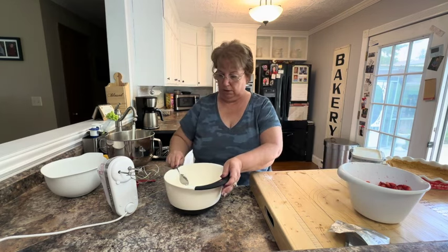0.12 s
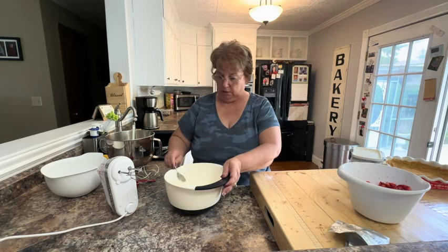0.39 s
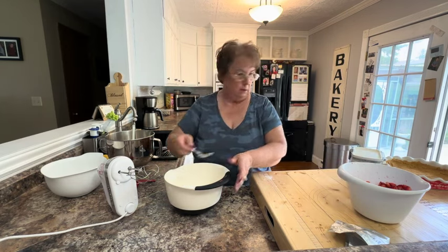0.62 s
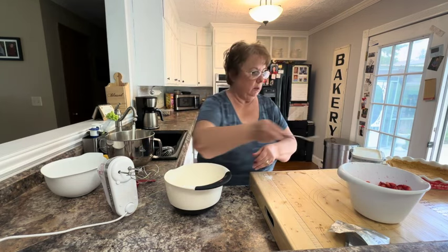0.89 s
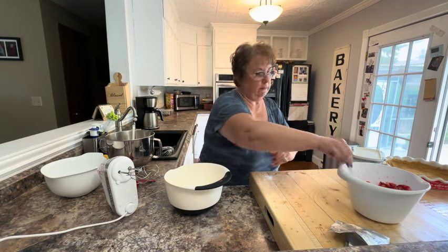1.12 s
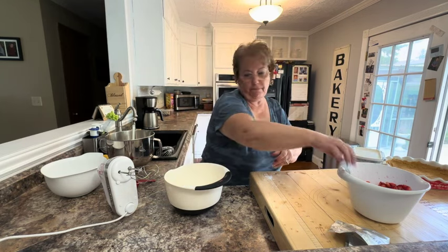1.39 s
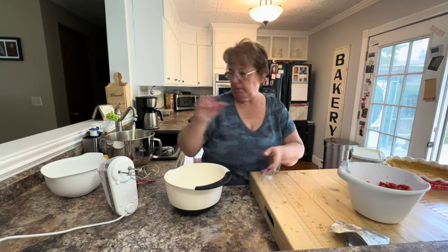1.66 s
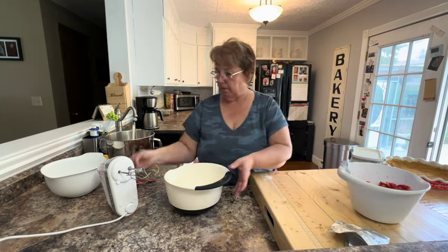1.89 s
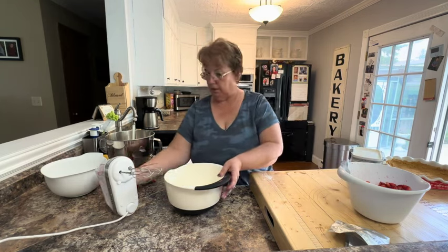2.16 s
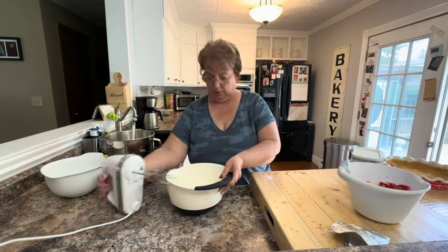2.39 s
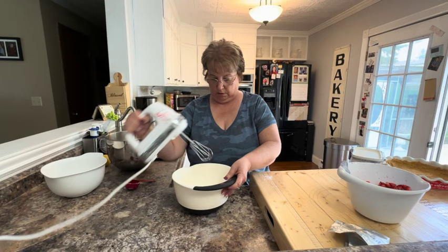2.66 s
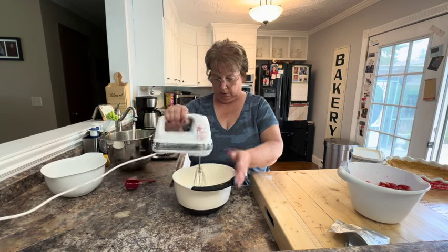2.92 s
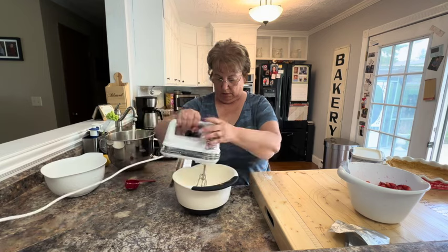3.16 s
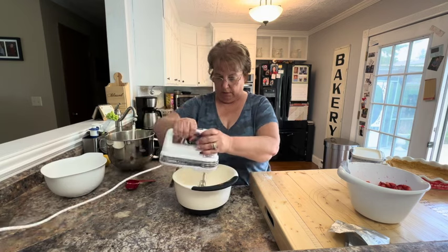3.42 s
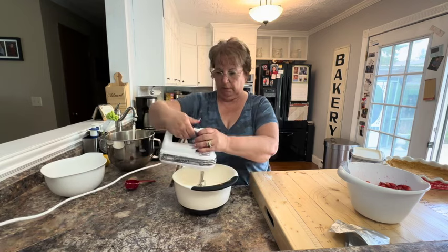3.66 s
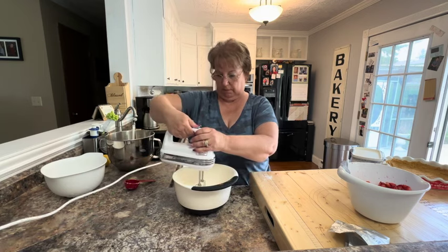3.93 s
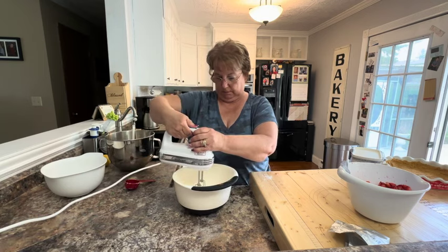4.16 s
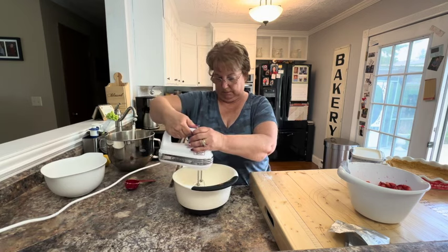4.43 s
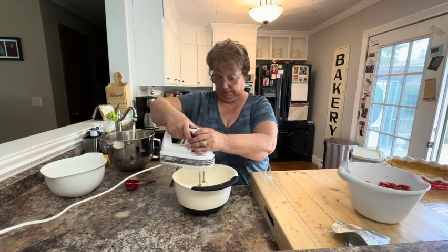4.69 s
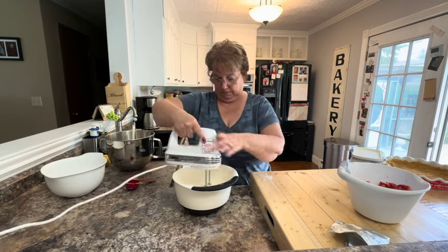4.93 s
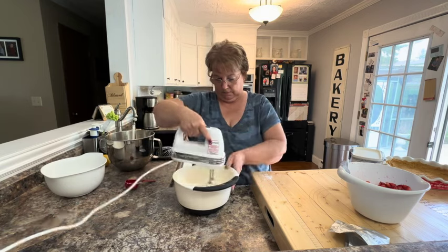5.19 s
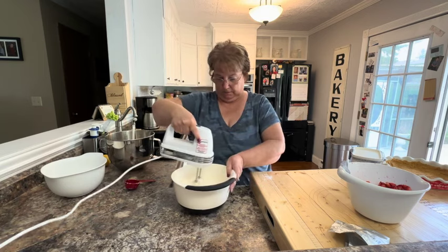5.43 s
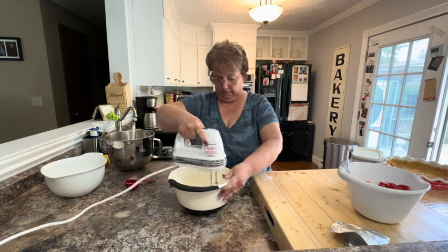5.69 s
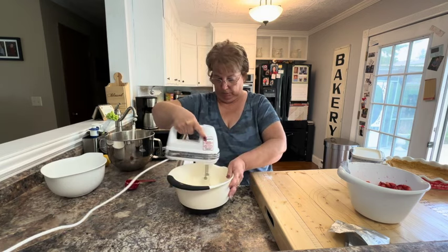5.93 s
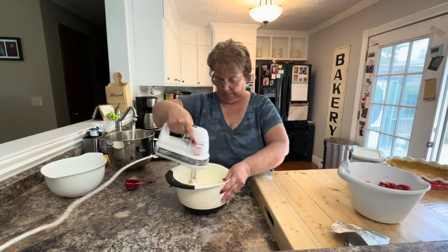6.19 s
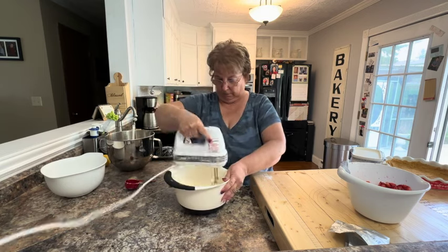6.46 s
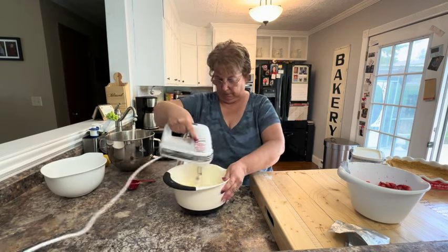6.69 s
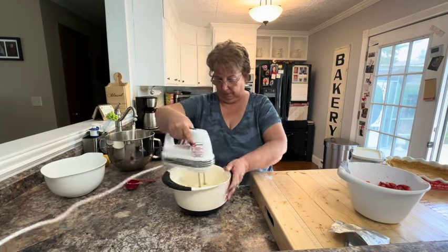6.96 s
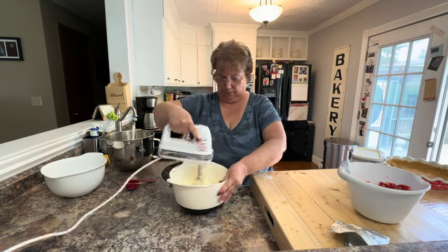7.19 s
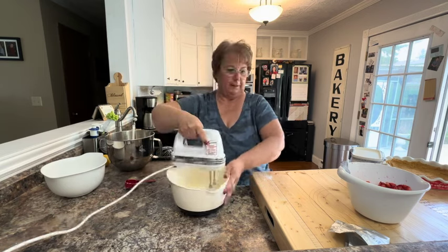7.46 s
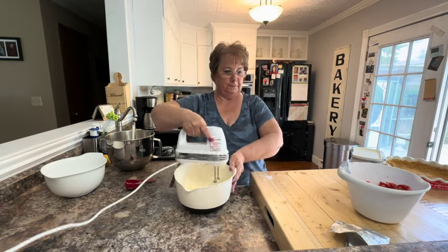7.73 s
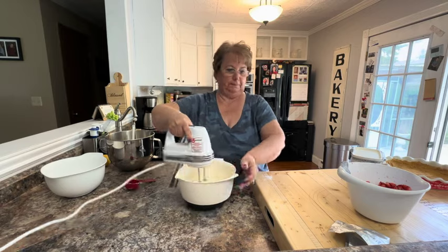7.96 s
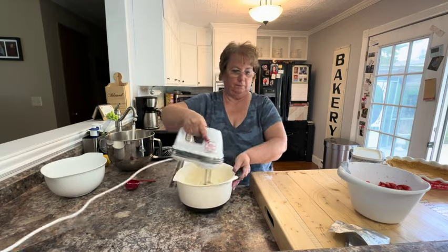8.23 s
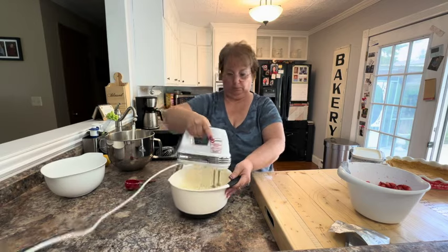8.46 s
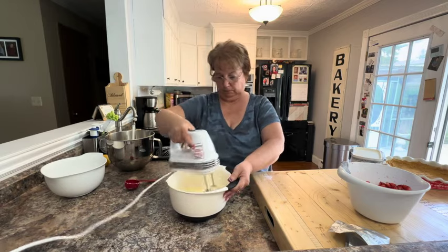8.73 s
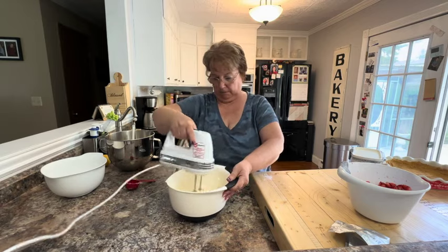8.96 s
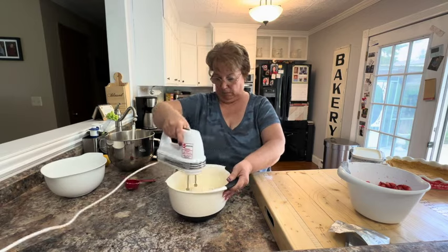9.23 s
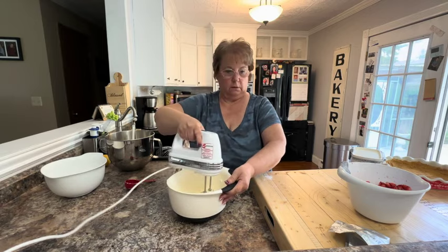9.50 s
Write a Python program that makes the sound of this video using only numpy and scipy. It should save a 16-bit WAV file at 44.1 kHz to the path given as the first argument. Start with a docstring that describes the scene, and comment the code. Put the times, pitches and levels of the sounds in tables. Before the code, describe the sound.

Dull plastic bowl taps, a wooden clack and a hard cup knock over faint low house hum and soft rustling. After light handling noises an electric hand mixer clicks on and climbs into a buzzing, airy whine with beaters churning batter. Abruptly it drops far in level and plays sped up, thin and high with fluttering pitch. Indoor kitchen, fairly close single microphone, short reflections.

```python
"""A home kitchen: a spoon taps a plastic bowl and is laid on a board, a cup and a hand mixer knock on the stone counter.
Each blow rings damped sines and adds bursts of noise; floor, counter and room answer it.
The mixer's switch clicks, its mains motor runs up with whining tones and noisy air, and its beaters slap batter.
From 5.598 s on, everything plays 2.4 times faster, so higher in pitch, and turned down by 18 dB."""
import sys
import numpy as np
from scipy import signal
from scipy.fft import rfft, irfft, next_fast_len
from scipy.io import wavfile
from scipy.ndimage import uniform_filter1d

SR = 44100
rng = np.random.default_rng(int(sys.argv[2]) if len(sys.argv) > 2 else 0)


def master(y):
    """Save y as 16-bit WAV."""
    cut = np.clip(np.atleast_2d(y).T, -1, 1)
    pcm = np.round(cut * 32767)  # scale
    wavfile.write(sys.argv[1], SR, pcm.astype(np.int16))


def field_ratio(decibels):
    """Amplitude ratio for a level in dB (20 dB per decade); scalars and array-likes work."""
    return 10 ** (np.asarray(decibels, dtype=float) / 20)


N = 423801
SPEED_UP_S, PACE = 5.598, 12 / 5   # heard time at which the speed-up starts, and how many times faster
SPEED_UP = round(SPEED_UP_S * SR)
LIVE = SPEED_UP + round((N - SPEED_UP) * PACE)   # samples of kitchen time, before the speed-up
MAINS_PULSE_HZ = 120   # in kitchen time, like every pitch below

# Table levels are relative: the functions trim them. Times are heard times.
# ways the plastic bowl rings: (frequency [Hz], level [dB], time to fall 60 dB [s])
BOWL_MODES = [(380, -3, 0.022), (540, 2.5, .028), (683, 0.5, .024), (830, -8, .016), (1090, -7, .016),
              (1310, -5, .016), (1465, -2, .018), (1610, -4, .016), (1780, -8, 0.012), (2230, -11, .01),
              (2900, -17, 0.008), (3290, -11, .008), (3930, -16, .009)]


def rms_one(x):
    """Scale to rms 1."""
    return x / np.sqrt(np.mean(x ** 2) + 1e-20)


def live_sample(s):
    """Turn heard seconds into samples of kitchen time."""
    s = np.asarray(s)
    kitchen_s = s + np.maximum(s - SPEED_UP_S, 0) * (PACE - 1)
    return np.round(kitchen_s * SR).astype(int)


def in_time(rows):
    """Draw each column of a table as a curve, sample by sample in kitchen time."""
    s, *columns = np.transpose(rows)
    return [np.interp(np.arange(LIVE), live_sample(s), c) for c in columns]


def at_hz(points, hz):
    """Read a table between its points on a log-frequency axis."""
    point_hz, value = np.transpose(points)
    return np.interp(np.log(hz), np.log(point_hz), value)


def band(x, low_hz, high_hz):
    """Butterworth band-pass: keep only the pitches between two limits."""
    sos = signal.butter(2, [low_hz, min(high_hz, .45 * SR)], "band", fs=SR, output="sos")
    return signal.sosfilt(sos, x)


def above(x, hz):
    """Butterworth high-pass: keep only the pitches above a limit."""
    return signal.sosfilt(signal.butter(2, hz, "high", fs=SR, output="sos"), x)


def coloured(spectrum, size):
    """Noise shaped to a given spectrum, rms 1."""
    fast = next_fast_len(size)
    hz = np.maximum(np.arange(fast // 2 + 1) * SR / fast, 1)
    shaped = rfft(rng.standard_normal(fast)) * field_ratio(at_hz(spectrum, hz))
    return rms_one(irfft(shaped, fast)[:size])


def drift(rate):
    """Slow random wander of rms 1: straight lines between 2 * rate random points a second."""
    steps = rng.standard_normal(int(LIVE / SR * 2 * rate) + 2)
    return rms_one(np.interp(np.arange(LIVE) / SR * 2 * rate, np.arange(len(steps)), steps))


def resonance(x, hz, width_hz):
    """Two-pole resonance with gain 1 at its peak."""
    r = np.exp(-np.pi * width_hz / SR)
    return signal.lfilter([(1 - r * r) / 2, 0, (r * r - 1) / 2], [1, -2 * r * np.cos(2 * np.pi * hz / SR), r * r], x)


def clicks(at, db, size):
    """One impulse per blow."""
    return np.bincount(at, field_ratio(db), size)


def ring(impulses, hz, t60):
    """A unit impulse sets a sine of starting height 1 ringing; it falls 60 dB in t60 seconds."""
    r, w = field_ratio(-60 / (t60 * SR)), 2 * np.pi * hz / SR
    return signal.lfilter([0, np.sin(w)], [1, -2 * r * np.cos(w), r * r], impulses + 1e-18)


def blows(events, modes, top_db, spread_db, chatter_s):
    """Each blow rings the body, knocks and cracks; harder contacts tilt the ringing up; top_db lifts the crack's top."""
    s, body_db, crack_db, hard_db = np.transpose(events)
    first = max(live_sample(s[0]) - 100, 0)
    at = live_sample(s) - first
    size = min(at[-1] + SR // 2, LIVE - first)
    low_hz = .7 * modes[0][0]

    def puff(db, t60, low_hz, high_hz):
        """Dying band noise with a rounded start."""
        fade = signal.lfilter([1], [1, -field_ratio(-60 / (t60 * SR))], clicks(at, db, size))
        noise = band(band(rng.standard_normal(size), low_hz, high_hz), low_hz, high_hz)
        return signal.lfilter([.04], [1, -.96], fade) * noise

    luck = rng.normal(0, spread_db, (len(at), len(modes)))   # where the blow lands favours some modes
    late = (rng.random(luck.shape) * chatter_s * SR).astype(int)   # the contact chatters: modes start unevenly
    body = np.zeros(size)
    for k, (hz, db, t60) in enumerate(modes):
        mode_db = body_db + db - 5.0 + hard_db * np.log2(hz / 1000) + luck[:, k]
        body += ring(clicks(at + late[:, k], mode_db, size), hz, t60)
    # the contact lasts about a quarter of a millisecond
    body = above(np.convolve(body, np.hanning(12) / 5.5)[:size], low_hz)
    # the many dull modes blur together
    knock = puff(body_db - 1.5, 0.028, low_hz, 1200) + puff(body_db - 3.0 + hard_db, 0.022, 1100, 2800)
    crack = puff(crack_db + 10, 0.013, 2500, 8000) + puff(crack_db + top_db, 0.009, 8500, 19000)
    return np.pad(body + knock + crack, (first, LIVE - first - size))


def earlier_tap():
    """A bowl tap at time 0, of which only the echo will be heard."""
    return blows([(0, -22, -42.0, -0.6)], BOWL_MODES, top_db=7.0, spread_db=2.5, chatter_s=.002)


def kitchen(x):
    """Reflections: octave bands of noise, each dying at its own rate."""
    # how long the room rings: (frequency [Hz], time to fall 60 dB [s])
    room_t60 = [(100, 0.43), (1000, 0.4), (4000, 0.35), (12000, 0.24)]
    t = np.arange(SR // 2) / SR
    tail = np.zeros(len(t))
    for low in 44 * 2 ** np.arange(9):
        tail += band(rng.standard_normal(len(t)), low, 2 * low) * field_ratio(-60 * t / at_hz(room_t60, 1.2 * low))
    tail *= np.clip((t - .003) / 0.0035, 0, 1)   # the first reflection needs 3 ms
    return signal.fftconvolve(x, tail / np.sqrt(np.sum(tail ** 2)))[:LIVE]


def counter_and_floor():
    """Heavy blows push floor and counter for 5 ms, and these heavy parts ring low."""
    # blows that shake them: (time [s], floor boom level [dB], counter thud level [dB], hollow thump level [dB])
    heavy = [(0, -41.5, -47, -54.5), (0.101, -35, -36, -37.5), (0.293, -38, -24, -28),
             (1.144, -70, -43.5, -47), (1.183, -65, -25.5, -19), (1.354, -68, -35.5, -36.5),
             (2.276, -55, -26, -45.5), (2.294, -49, -31.5, -43), (2.43, -46, -30, -41),
             (3.353, -42.5, -53, -36), (4.3, -47, -56, -57)]
    s, boom_db, thud_db, thump_db = np.transpose(heavy)
    at, push = live_sample(s), np.hanning(SR // 200) / (SR // 400)
    thud = ring(clicks(at, thud_db + 12, SPEED_UP), hz=169.5, t60=.075)
    thump = ring(clicks(at, thump_db + 11.5, SPEED_UP), hz=265, t60=0.022)
    boom = ring(clicks(at, boom_db + 9.0, SPEED_UP), hz=66.94, t60=0.086)
    low = above(above(thud + thump, 130), 130) + boom
    return np.pad(np.convolve(low, push)[:SPEED_UP], (0, LIVE - SPEED_UP))


def background():
    """Noise shaped as low house hum and the rustle of sleeves and cord, up to the speed-up only."""
    # fridge and house: (frequency [Hz], level [dB per Hz])
    hum_spectrum = [(18, -42.5), (30, -20), (81, -6), (97, 3.5), (115, -8.5), (135, -16), (424, -38),
                    (460, -25), (500, -52), (650, -66.5), (1100, -120)]
    # sleeves and cord move: (start [s], length [s], hiss level [dB], rub level [dB], air level [dB])
    moves = [(0.69, 0.057, -63, -80.5, -75), (2.003, 0.75, -69.5, -65.5, -75),
             (2.894, 0.43, -73.5, -64, -82), (3.144, 0.3, -70, -66.5, -74)]
    # between the moves: hiss level [dB], rub level [dB], air level [dB]
    still_db = [-75, -74, -85]
    rise_s, fade_s = 0.026, 0.23
    t = np.arange(SPEED_UP) / SR
    level = field_ratio(still_db)[:, None] * np.ones(SPEED_UP)
    for s, length, *db in moves:
        shape = np.clip((t - s) / rise_s, 0, 1) * np.exp(-np.maximum(t - s - length, 0) / fade_s)
        level = np.maximum(level, field_ratio(db)[:, None] * shape)

    def noise():
        """Plain white noise."""
        return rng.standard_normal(SPEED_UP)

    hiss = rms_one(band(band(noise(), 1500, 7000), 1500, 7000)) * level[0] * field_ratio(1.0 * drift(7.0)[:SPEED_UP])
    rub = rms_one(band(noise(), 120, 2000)) * level[1] * field_ratio(2.0 * drift(9.5)[:SPEED_UP])
    air = rms_one(band(noise(), 9500, 16000)) * level[2]
    hum = field_ratio(-65) * coloured(hum_spectrum, SPEED_UP)
    return np.pad(hum + hiss + rub + air, (0, LIVE - SPEED_UP))


def spoon_on_bowl():
    """The spoon sets the plastic bowl ringing."""
    # taps: (time [s], body level [dB], crack level [dB], hardness [dB per octave])
    taps = [(0.101, -10.5, -30, 0.6), (0.293, -0.5, -25, 0.35)]
    return blows(taps, BOWL_MODES, top_db=13.0, spread_db=1.2, chatter_s=0.0018)


def spoon_on_board():
    """The spoon is laid down, and the board rings for a few hundredths of a second at most."""
    # contacts: (time [s], body level [dB], crack level [dB], hardness [dB per octave])
    contacts = [(1.144, -36, -44, 3), (1.182, -17, -29.5, -1.5), (1.333, -43, -54, -3),
                (1.353, -9.5, -33.5, 0.1)]
    # ways the board rings: (frequency [Hz], level [dB], time to fall 60 dB [s])
    board_modes = [(318, -17.5, 0.032), (533, -17, 0.061), (740, -5.5, 0.017), (970, 3.5, 0.011),
                   (1425, 2, 0.014), (2220, -1, 0.0075), (2530, -4, 0.0096), (3000, -20, 0.017)]
    return blows(contacts, board_modes, top_db=3.5, spread_db=1.0, chatter_s=0.00304)


def cup_on_counter():
    """The cup rings briefly as it knocks on the stone counter."""
    # knocks: (time [s], body level [dB], crack level [dB], hardness [dB per octave])
    knocks = [(2.036, -40, -66, -15), (2.234, -28.5, -31.5, 10), (2.272, -23, -65, -10),
              (2.294, -18.5, -33.5, -0.5), (2.403, -8.5, -22, 2.5), (2.431, -2, -35.5, -3)]
    # ways the cup rings: (frequency [Hz], level [dB], time to fall 60 dB [s])
    cup_modes = [(585, -14, 0.022), (880, -23, 0.03), (1094, -6, 0.022), (1440, -9, 0.031),
                 (1650, -4, 0.032), (1920, -17, .02), (2380, -14, 0.014), (2970, -20, 0.01),
                 (3700, -12.5, 0.009), (5000, -16, .01), (6060, -18, .01)]
    return blows(knocks, cup_modes, top_db=6.0, spread_db=1.5, chatter_s=.008)


def mixer_handled():
    """Handling and knocks make the mixer's shell ring."""
    # contacts: (time [s], body level [dB], crack level [dB], hardness [dB per octave])
    contacts = [(2.921, -38, -62, 0), (2.931, -39, -62, 0), (2.951, -44, -61, 6), (2.982, -38, -78, -2.8),
                (3.302, -31.5, -66, -1.5), (3.351, -43, -60, 6), (3.458, -38, -57, 2.5),
                (3.73, -54, -86, 1), (3.875, -75, -68, 8), (3.902, -51, -90, -3), (4.092, -51, -74, 6),
                (4.11, -47, -80, -1.5), (4.186, -50, -86.5, -2.5), (4.299, -33, -26.5, 4),
                (4.535, -39, -48, 4)]
    # ways the shell rings: (frequency [Hz], level [dB], time to fall 60 dB [s])
    shell_modes = [(384, -16, 0.017), (970, -11, 0.017), (1437, 1.5, 0.035), (1800, -5, 0.015),
                   (2240, -1.5, 0.014), (3080, -4, 0.006), (3980, -1.5, 0.008)]
    return blows(contacts, shell_modes, top_db=10.5, spread_db=1.5, chatter_s=.004)


def whine(turns, t):
    """Rotor slots sing, split into combs by the pulsing mains current; fan and unbalance add single tones."""
    # slot tones: (multiple of rotor speed, level [dB])
    slot_tones = [(12, 0), (24, -8), (36, -12)]
    # comb around the first slot tone, from three mains pulses below to four above: level [dB]
    teeth = [-17, -10.5, -1, -1.5, -1.5, -4, -12.5, -21]
    # narrower comb of the overtones, from one pulse below to two above: level [dB]
    overtone_teeth = [-3.5, -2.5, -4.5, -10]
    # casing resonances: (frequency [Hz], width [Hz], boost [dB])
    casing = [(946, 220, 16.5), (1486, 140, 7.5), (2278, 137, 5.5), (2494, 35, 6), (2799, 75, 19)]
    angle = 2 * np.pi * np.cumsum(turns * (1 + .002 * drift(40))) / SR
    speed = turns / 200

    def comb(teeth_db, start):
        """Teeth one mains pulse apart, each wavering on its own."""
        total = 0
        for k, db in enumerate(teeth_db, start=start):
            height = field_ratio(db + 2.0 * drift(3) + 2.2 * drift(11))
            total = total + height * np.exp(1j * (2 * np.pi * k * MAINS_PULSE_HZ * t + .5 * drift(8)))
        return total

    slots = [field_ratio(db) * np.exp(1j * k * angle) for k, db in slot_tones]
    # overtones are strongest while the slow rotor draws heavy current
    overtones = comb(overtone_teeth, start=-1) * sum(slots[1:]) * field_ratio(18 * (1 - speed))
    # they escape through the vents only in this band
    escaped = band(np.imag(overtones), low_hz=1900, high_hz=4300)
    tones = np.imag(comb(teeth, start=-3) * slots[0]) + escaped
    for hz, width_hz, db in casing:
        tones = tones + (field_ratio(db) - 1) * resonance(tones, hz, width_hz)
    fan = field_ratio(-15.5 + 2.2 * drift(13)) * np.sin(16 * angle)   # 16 blades
    fan = fan + field_ratio(5) * resonance(fan, 3120, 200)   # the cowl favours the lower speeds
    wobble = field_ratio(-13 + 2.5 * drift(4)) * np.sin(2 * angle)   # the unbalanced rotor shakes twice a turn
    return rms_one(tones) + (fan + wobble) * speed ** 3


def roar(turns, pulse):
    """Cooling air and brush hiss as noise; the treble grows with speed and flickers with the current."""
    # colour of the roar: (frequency [Hz], level [dB per Hz])
    roar_spectrum = [(150, -24), (250, -15.5), (386, -5.5), (519, -3.5), (590, -10), (680, -8), (750, -17),
                     (980, -7), (1190, -14), (1410, -5.5), (1520, -10), (1760, -9.5), (1980, -15),
                     (2490, -8.5), (3710, -13.5), (7060, -22.5), (8700, -27.5), (11500, -22.5),
                     (12600, -23), (12900, -16), (13200, -24), (16000, -24)]
    air = coloured(roar_spectrum, LIVE)
    low = band(air, 20, 3100)
    high = (air - low) * (turns / 200) ** 1.05 * (1 + 0.051 * pulse)
    wavering = low * field_ratio(1.8 * drift(22) + 1.2 * drift(3.5)) + high * field_ratio(1.0 * drift(4.3))
    return wavering / np.std(band(air, 570, 1870))


def batter(turns):
    """The geared-down beaters slap batter against the wall, each slap with its own force."""
    # bowl resonances: (frequency [Hz], width [Hz], level [dB])
    bowl_resonances = [(65.7, 8.1, -8), (275, 35, -8.5), (146.4, 61, -3), (365, 90, -0.5),
                       (509.6, 31, -5.5), (987, 130, -5), (1478, 300, -3)]
    beats = np.cumsum(turns) / SR / 19.5   # one slap per 19.5 rotor turns
    force = field_ratio(rng.normal(0, 3.0, int(beats[-1]) + 1))[beats.astype(int)]
    strength = .38 + force * np.exp(-4.0 * (beats % 1))
    slaps = strength * field_ratio(1.8 * drift(3)) * rng.standard_normal(LIVE)   # the batter lies unevenly
    total = 0
    for hz, width_hz, db in bowl_resonances:
        # filtered twice, the second time twice as wide
        total = total + field_ratio(db) * rms_one(resonance(resonance(slaps, hz, width_hz), hz, 2 * width_hz))
    return rms_one(total)


def mixer():
    """Whine, roar and batter from the moment the switch clicks; the roar follows speed and whine."""
    # run-up, then sagging as the beaters meet thick batter: (time [s], rotor speed [turns per s])
    rotor_curve = [(4.3, 30), (4.39, 64), (4.45, 88), (4.57, 131), (4.66, 156), (4.75, 176), (4.83, 187.5),
                   (4.96, 193), (5.06, 201.5), (5.2, 201.5), (5.34, 216.5), (5.4, 215.5), (5.51, 194),
                   (5.6, 194.5), (5.78, 213.5), (5.836, 226), (5.908, 231.5), (5.948, 223), (6.11, 219.5),
                   (6.164, 228), (6.26, 210), (6.3, 210.5), (6.332, 219.5), (6.39, 220.5), (6.44, 206),
                   (6.524, 224), (6.572, 219.5), (6.636, 203), (6.692, 217.5), (6.748, 214), (6.812, 199.5),
                   (6.9, 212.5), (6.988, 215), (7.14, 235.5), (7.188, 234), (7.26, 216.5), (7.325, 211.5),
                   (7.444, 226), (7.516, 230.5), (7.604, 224), (7.644, 227.5), (7.74, 220), (7.836, 230.5),
                   (7.94, 210), (8.012, 214), (8.068, 207.5), (8.172, 210.5), (8.284, 200), (8.34, 211.5),
                   (8.388, 213.5), (8.484, 209), (8.535, 215), (8.636, 205.5), (8.724, 216), (8.852, 202),
                   (8.948, 199), (9.02, 184), (9.07, 181.5), (9.135, 202), (9.212, 204.5), (9.34, 195.5),
                   (9.42, 205.5), (9.508, 196), (9.61, 205)]
    # whine: (time [s], level [dB])
    whine_curve = [(4.3, -50), (4.4, -29), (4.5, -29.5), (4.66, -27.5), (4.824, -28.5), (5.2, -26.5),
                   (5.36, -28), (5.6, -30), (5.95, -32.5), (6.335, -32), (6.8, -33.5), (7.1, -32.5),
                   (8.3, -33), (8.55, -31), (8.9, -32.5), (9.61, -32.5)]
    # how deep the beaters work in the batter, as its loudness: (time [s], level [dB])
    batter_curve = [(4.3, -44), (4.4, -60), (4.6, -49), (4.7, -40), (4.85, -39), (5.045, -31.5), (5.4, -34),
                    (5.63, -37.5), (7.4, -37.5), (9.61, -39.5)]
    switch_on_s, rotor_lag_s = 4.3, .05
    click_db, click_s = 25, 0.023   # the switch's click, a short burst of noise: it lifts the roar briefly
    usual_turns, usual_whine_db = 210, -33
    (turns,), (whine_db,), (batter_db,) = in_time(rotor_curve), in_time(whine_curve), in_time(batter_curve)
    # the rotor's inertia rounds every change of speed
    turns = uniform_filter1d(turns, size=int(rotor_lag_s * SR), mode="nearest")
    t = np.arange(LIVE) / SR
    pulse = np.cos(2 * np.pi * MAINS_PULSE_HZ * t)
    since = np.maximum(t - switch_on_s, 0)
    roar_db = -36.3 + 0.065 * np.maximum(turns - usual_turns, -40)
    roar_db = roar_db + 0.55 * (whine_db - usual_whine_db) + click_db * np.exp(-since / click_s)
    on = np.clip(since / 0.005, 0, 1)
    motor = field_ratio(whine_db - 1.8) * whine(turns, t) + field_ratio(roar_db - 4) * roar(turns, pulse)
    return on * (motor + field_ratio(batter_db - 1.8) * batter(turns))


def beater_on_bowl():
    """The beaters knock the plastic bowl and set it ringing."""
    # knocks: (time [s], body level [dB], crack level [dB], hardness [dB per octave])
    knocks = [(5.672, -23, -49.5, 8), (6.043, -27, -50.5, -12), (6.105, -15, -40, 5), (6.13, -20, -32, 8),
              (6.143, -18, -35, 7.5), (7.045, -22, -38, 8), (8.691, -20.5, -54, -2), (8.726, -9.5, -26, 9)]
    return blows(knocks, BOWL_MODES, top_db=7.0, spread_db=0.0, chatter_s=0.00206)


def scene():
    """All sources in kitchen time, then the later part hurried and turned down."""
    taps = counter_and_floor() + spoon_on_bowl() + spoon_on_board()
    taps += cup_on_counter() + mixer_handled() + beater_on_bowl()
    motor = mixer()
    # the mixer is moved about: its reflections swing between two sets, 1.3 times per kitchen second plus a drift
    place = np.pi * 1.3 * np.arange(LIVE) / SR + drift(.7)
    motor_echoes = kitchen(motor * np.cos(place)) + kitchen(motor * np.sin(place))
    echoes = kitchen(taps + earlier_tap()) + field_ratio(-4.5) * motor_echoes
    live = taps + motor + field_ratio(-6.5) * echoes + background()
    # microphone bass cut
    live = signal.sosfilt(signal.butter(8, 50, "high", fs=SR, output="sos"), live)
    hurried = signal.resample_poly(live[SPEED_UP:], up=5, down=12)   # 2.4 times faster
    heard = np.concatenate([live[:SPEED_UP], field_ratio(-18) * hurried, np.zeros(9)])[:N]
    return np.stack([heard, heard])


def band_limit(x):
    """A steep low-pass at the top of the band."""
    return signal.sosfilt(signal.butter(12, 16850, fs=SR, output="sos"), x)


def record(dry):
    """One microphone on both channels, its top cut at 16.8 kHz."""
    top_cut = signal.cheby2(10, 60, 16800, fs=SR, output="sos")
    finished = signal.sosfilt(top_cut, dry)
    return band_limit(finished)


dry = scene()
out = record(dry)
master(out)
```